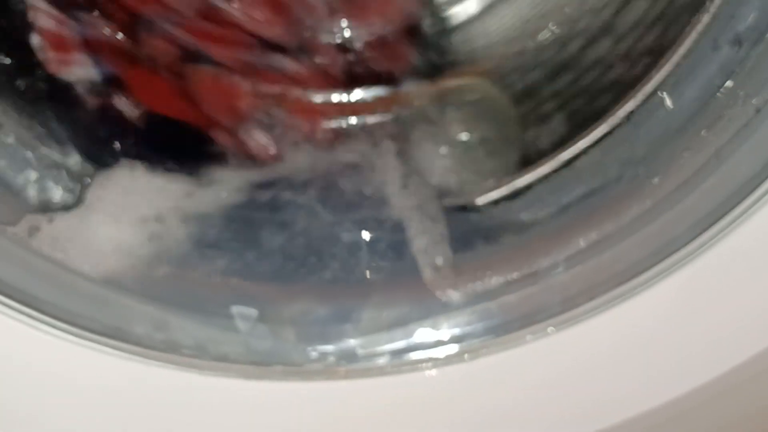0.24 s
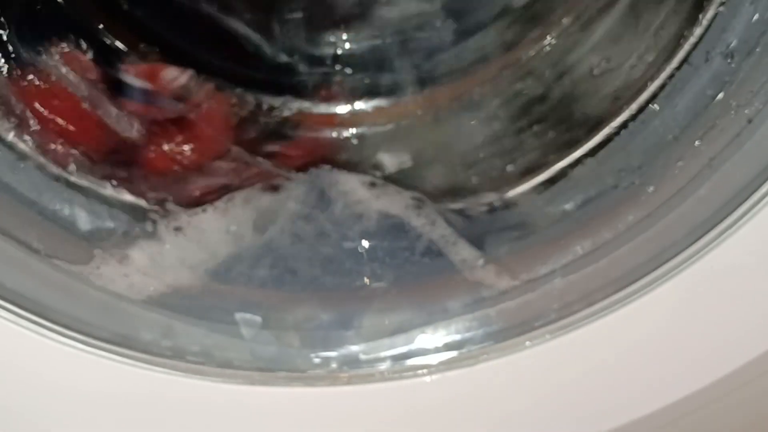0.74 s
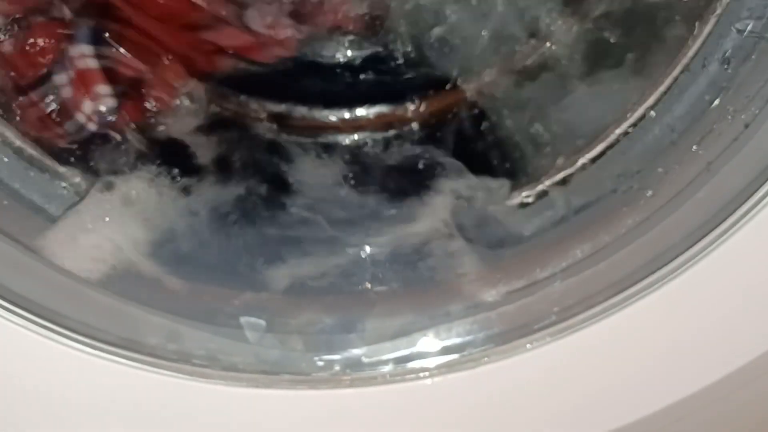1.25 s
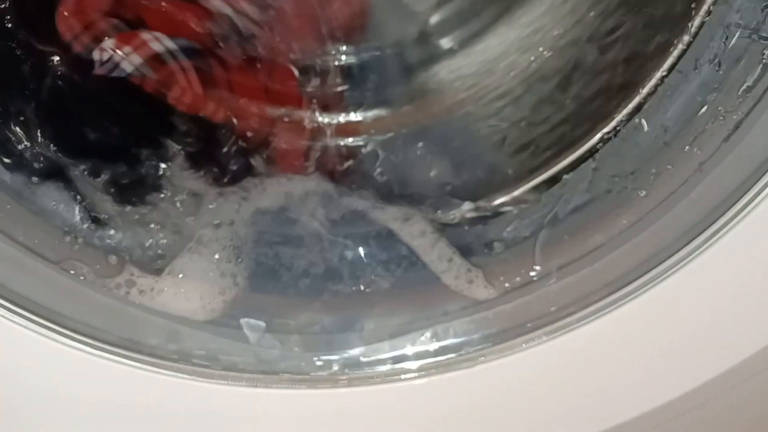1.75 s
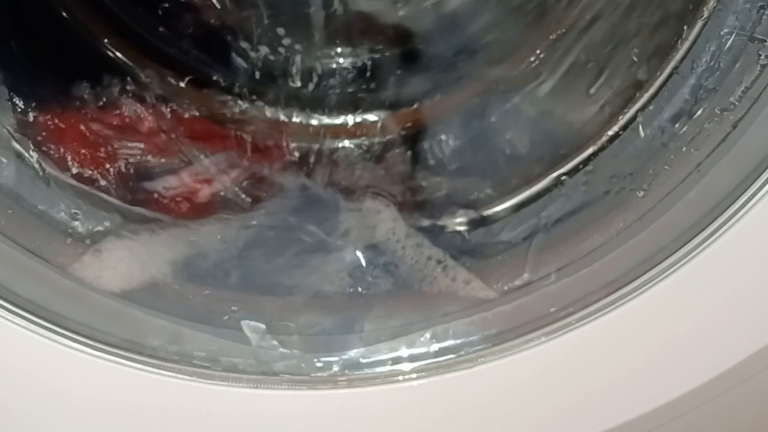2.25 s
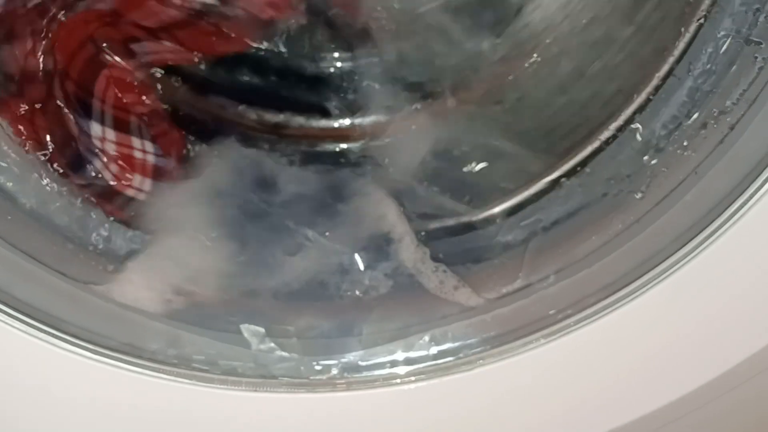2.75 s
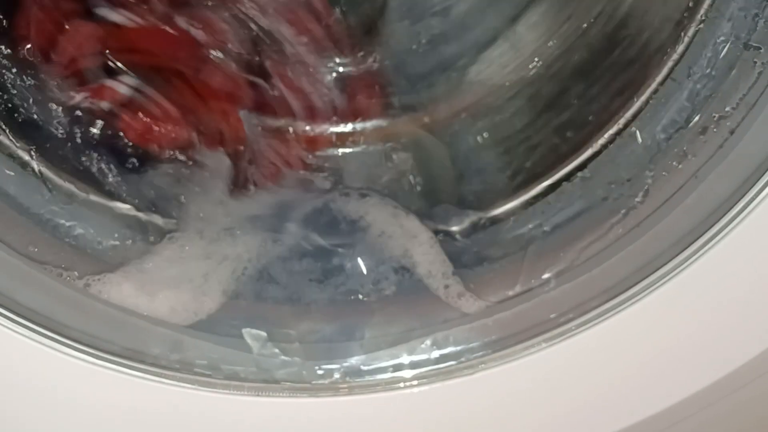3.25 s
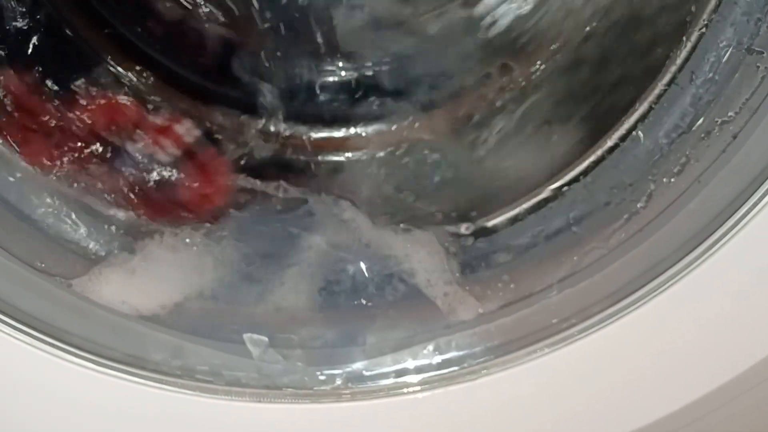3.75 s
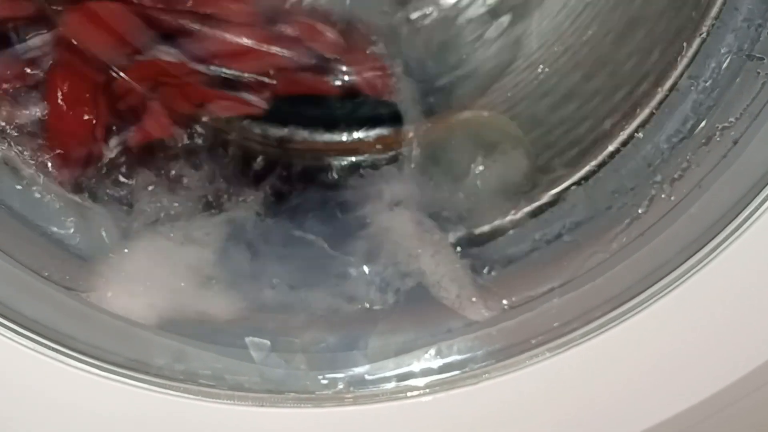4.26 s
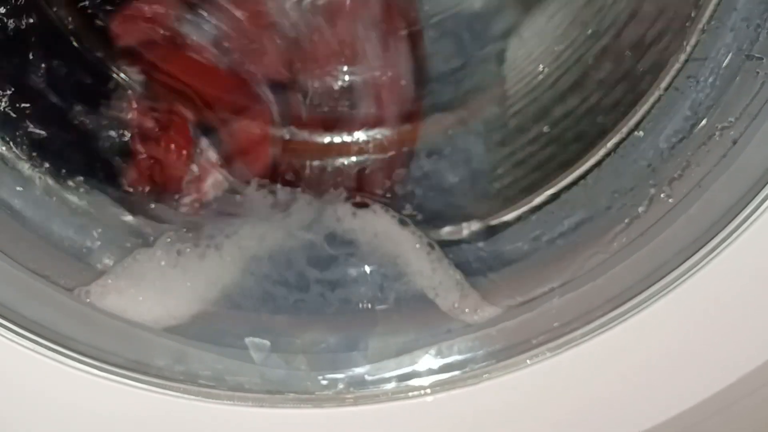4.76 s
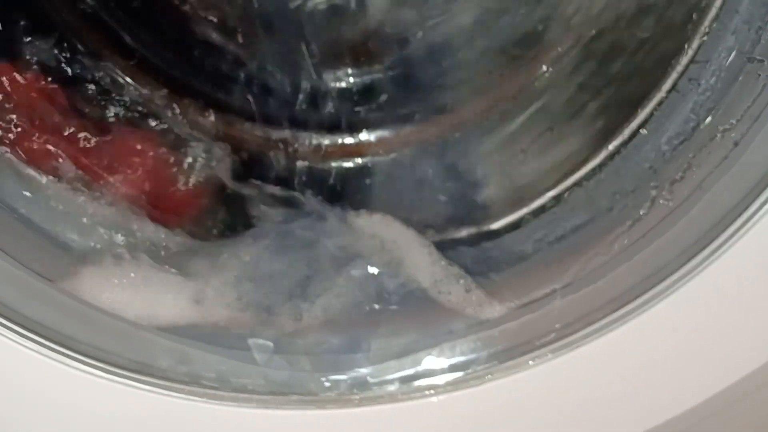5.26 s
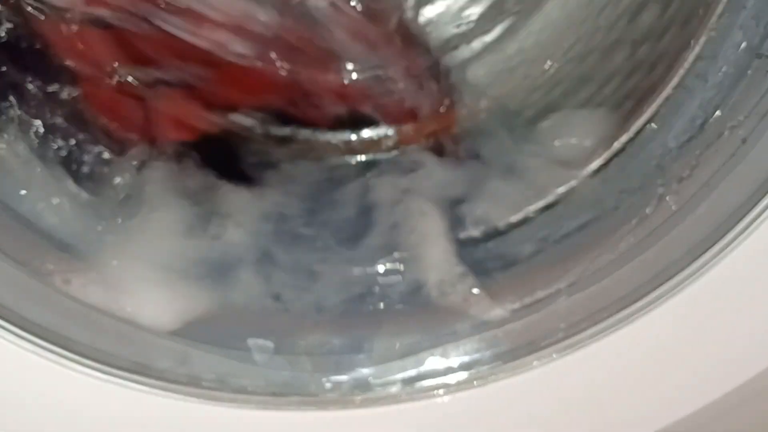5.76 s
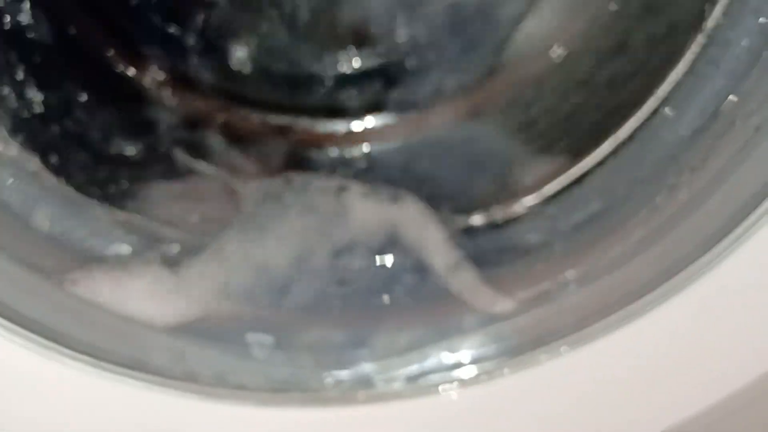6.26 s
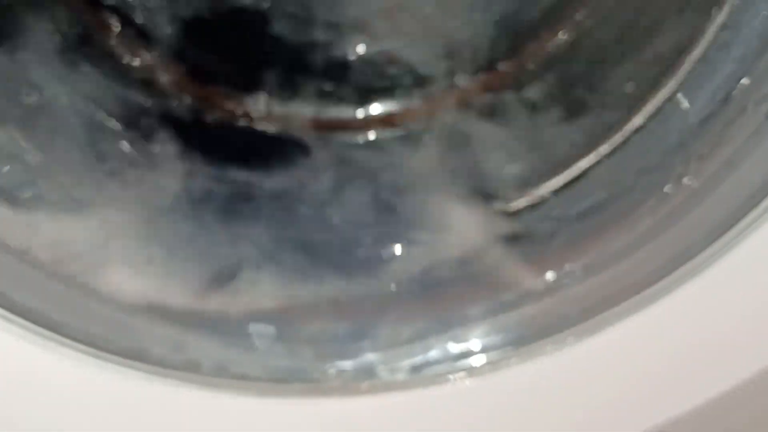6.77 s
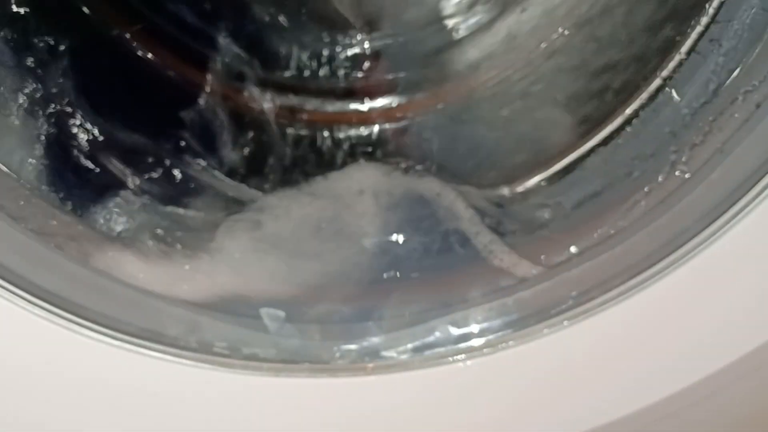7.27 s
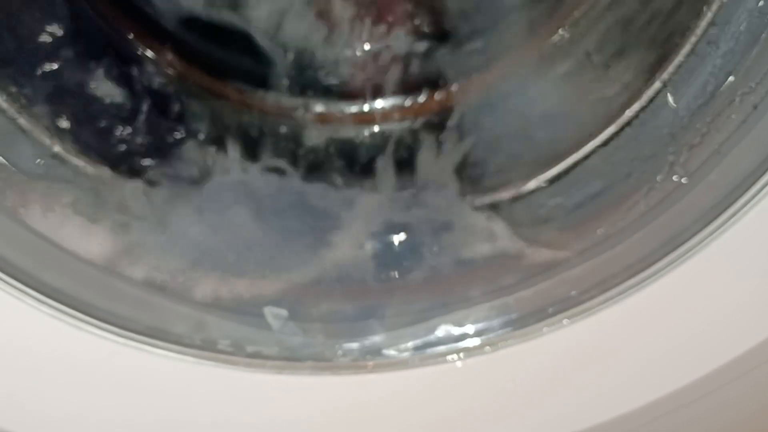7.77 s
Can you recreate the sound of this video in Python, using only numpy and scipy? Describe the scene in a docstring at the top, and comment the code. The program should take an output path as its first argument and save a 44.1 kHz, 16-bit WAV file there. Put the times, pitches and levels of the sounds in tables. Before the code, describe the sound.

A front-loading washer churns wet laundry up close, water sloshing and booming in the tub, spraying the glass door, with one hard knock midway.

```python
"""A front-loading washing machine tumbles wet laundry, heard close to its glass door.
From the start water heaves in the resonant tub, splashes and tinkles in the steel drum and sprays the glass.
Soon wet cloth flops down as damped pushes, air pockets gurgle as bubble notes and drops tick on the door.
Later something hard, perhaps a button, knocks on the glass and clinks on the steel, ringing their modes."""
import sys
import numpy as np
from scipy import signal
from scipy.fft import rfft, irfft
from scipy.io import wavfile

SR = 44100
rng = np.random.default_rng(int(sys.argv[2]) if len(sys.argv) > 2 else 0)


def log_audio(samples):
    """Write samples as a 16-bit WAV file to the path given in sys.argv[1]."""
    # one column per channel
    frames = np.atleast_2d(samples).T
    # limit to full scale, then quantise
    limited = np.clip(frames, -1, 1)
    pcm = np.round(limited * 32767).astype(np.int16)
    wavfile.write(sys.argv[1], SR, pcm)


N = 353593
HZ = np.fft.rfftfreq(N, 1 / SR)  # frequency of every bin
T = np.arange(N) / SR  # time in the scene, s
RING = np.arange(SR // 3) / SR  # time since an impact, s

# modes of the steel drum: (frequency [Hz], relative level [dB], t60 [s])
STEEL_MODES = [(1956, -5.5, 0.058), (2031.8, -5, 0.055), (2127, -10, 0.025), (2600, -13, 0.025)]
# spectrum of spray and drops on the door: (frequency [Hz], relative level [dB])
SPRAY_SPECTRUM = [(1260, 8.5), (2560, 3), (3760, 1.5), (5260, -1), (6160, -7), (7260, -6.5), (7760, -12),
                  (8400, -13), (8900, -10), (9860, -10.5), (11660, -6), (13460, -7.5), (14660, -11.5),
                  (15700, -16)]
# envelope of a slosh's splashing: (rise [s], sag [dB/s], drain time constant [s], steady churn [dB])
SPLASH_ENVELOPE = (0.21, 21, 0.07, -45.5)


def amp(db):
    """Converts level to amplitude: 20 dB is a factor of ten."""
    return 10 ** (np.asarray(db) / 20)


def unit(x):
    """Normalizes the mean power to 1."""
    return x / np.sqrt(np.mean(x ** 2) + 1e-20)


def read(points):
    """Interpolates a table over log frequency, as pitch is spaced."""
    hz, value = np.transpose(points)
    return np.interp(np.log(HZ + 1), np.log(hz), value)


def colour(x, gain):
    """Filters linearly: the spectrum is multiplied by a gain for every bin."""
    return irfft(rfft(x) * gain, N)


def add(mix, s, sound):
    """Superposes a sound on the mix from time s."""
    part = mix[..., round(s * SR):][..., :sound.shape[-1]]
    part += sound[..., :part.shape[-1]]


def wander(rate):
    """Low-passes noise to a slow fluctuation of rms 1, up to about rate in Hz."""
    return unit(colour(rng.standard_normal(N), np.exp(-(HZ / rate) ** 2)))


def two_sides(x):
    """Sets the coherence of the sides: two unrelated signals become a pair that shares its bass."""
    # (frequency [Hz], coherence of left and right [0-1])
    coherence = [(100, .985), (250, .96), (380, .85), (500, .2), (1000, .03), (2000, 0)]
    same = np.clip(read(coherence), 0, 1)
    right = colour(x[0], same) + colour(x[1], np.sqrt(1 - same ** 2))
    return np.array([x[0], right])


def impacts(per_s, spread_db):
    """A Poisson-like train of clicks of either sign, with levels spread exponentially in dB."""
    size = amp(spread_db * np.minimum(rng.exponential(1, N), 4.5))
    sign = rng.choice([-1, 1], N)
    return size * sign * (rng.random(N) < per_s / SR)


def bursts(per_s, spread_db, decay, tail_db):
    """Incoherent impacts add in power: noise follows their decays, each with a faint tail from the drum."""
    dying = np.exp(-2 * RING / decay) + amp(2 * tail_db) * np.exp(-RING / 0.012)
    power = signal.oaconvolve(impacts(per_s, spread_db) ** 2, dying)[:N]
    return unit(np.sqrt(abs(power)) * rng.standard_normal((2, N)))


def echoes(x, t60):
    """Diffuse reverberation: exponentially decaying noise, different on each side, of about energy 1."""
    tail = rng.standard_normal((2, len(RING))) * amp(-60 * RING / t60)
    tail = tail / np.linalg.norm(tail[0])
    return signal.oaconvolve(np.atleast_2d(x), tail, axes=1)[:, :N]


def ring(modes, rise):
    """Modal synthesis: damped sines build up over a short contact time."""
    waves = sum(amp(db - 60 * RING / t60) * np.sin(2 * np.pi * hz * RING) for hz, db, t60 in modes)
    return waves * (1 - np.exp(-RING / rise))


def bubble(hz, cycles, glide):
    """Bubble resonance: a note dies away over some cycles, its pitch rising as it nears the surface."""
    age = RING[:int(5 * SR * cycles / hz)] * hz / cycles  # in decay times
    turns = cycles * age * (1 + glide * age / 2) + rng.random((2, 1))
    return (np.exp(-age) - np.exp(-age * cycles)) * np.sin(2 * np.pi * turns)


def bubbles(count, low_hz=450, high_hz=3400, cycles=8, glide=0.039, spread_db=0.5):
    """Superposed bubble resonances at random times, spread evenly in log pitch."""
    out = np.zeros((2, N))
    for when, pitch, size in rng.random((count, 3)):
        hz = low_hz * (high_hz / low_hz) ** pitch
        strength = hz * amp(-spread_db * np.log(size + 0.0205))
        add(out, when * N / SR, strength * bubble(hz, cycles, glide))
    return unit(out)


def sloshing(shape, axis, lead=0):
    """Power addition: the level in dB of all sloshes, starting up to lead seconds early, over a steady churn."""
    # water tipped over by the drum: (start [s], length [s],
    # heave in the tub [dB], splashing [dB], spray on the door [dB])
    sloshes = [(0.0, 0.04, -35.5, -36.5, -62), (0.1, 0.23, -32, -39, -54), (0.335, 0.23, -33.5, -39, -54.5),
               (0.68, 0.41, -39, -55.5, -67), (0.908, 0.11, -30, -33, -49.5),
               (1.07, 0.11, -33.5, -35, -46.5), (1.171, 0.21, -24, -34, -50), (1.418, 0.29, -29, -40, -52),
               (1.77, 0.12, -34.5, -38.5, -53), (1.938, 0.19, -34.5, -43, -51),
               (2.358, 0.1, -36.5, -39.5, -55), (2.525, 0.23, -35, -43, -52),
               (2.916, 0.12, -39, -44, -53.5), (3.053, 0.091, -32.5, -35.5, -53),
               (3.19, 0.07, -31.5, -42, -51), (3.29, 0.06, -34.5, -39, -55),
               (3.398, 0.086, -33, -38.5, -50.5), (3.59, 0.047, -39.5, -55, -58),
               (3.828, 0.34, -34, -40, -51.5), (4.216, 0.222, -39, -58.5, -54.5),
               (4.524, 0.09, -27, -44, -54.5), (4.766, 0.07, -37, -44, -57.5),
               (4.918, 0.28, -33.5, -42, -51.5), (5.337, 0.14, -34, -45, -52.5),
               (5.633, 0.3, -33.5, -41, -53.5), (6.028, 0.15, -29.5, -39, -55.5),
               (6.524, 0.13, -31, -32.5, -47), (6.678, 0.13, -31.5, -35, -44.5),
               (7.137, 0.21, -35.5, -44.5, -53.5), (7.527, 0.17, -39.5, -40.5, -49.5),
               (7.74, 0.19, -33.5, -40.5, -50.5)]
    rise, sag_db_per_s, drain, churn_db = shape
    power = np.full(N, amp(churn_db) ** 2)
    for start, length, *levels_db in sloshes:
        age = np.arange(0, length + 6 * drain, 1 / SR)
        build = np.sin(np.pi / 2 * np.minimum(age / rise, 1))
        fall = amp(-sag_db_per_s * age) * np.exp(-np.maximum(age - lead - length, 0) / drain)
        add(power, max(start - lead, 0), (amp(levels_db[axis]) * build * fall) ** 2)
    return 10 * np.log10(power)


def tub():
    """Resonant transfer function of the water-filled tub: a sum of damped oscillators."""
    # (frequency [Hz], width [Hz], peak gain [dB])
    resonances = [(80, 5.4, -16.5), (133.4, 5.9, -2), (165.4, 6.3, 1.5), (183.3, 8.8, 1.5),
                  (211.5, 10, 1.5), (249.5, 26.9, -1), (279.3, 17.7, 2), (320.8, 10, -1.5)]
    return sum(amp(db) * width * HZ / (width * HZ + 1j * (HZ ** 2 - hz ** 2))
               for hz, width, db in resonances)


def cavity():
    """Cavity resonance: the drum's air and walls lift bands of the water's sound."""
    # (frequency [Hz], full width at half the lift [Hz], lift [dB])
    lifts = [(570, 55, 2.5), (670, 37, 3.5), (737, 31, 9), (811.6, 31, 7), (840, 9.3, 6), (1075.5, 73, 4),
             (1374, 56, 3.5), (1513, 33, 5.5), (1824, 630, 4), (2550, 210, 4), (3835, 75, 4.5),
             (6940, 75, 7.5)]
    return amp(sum(db / (1 + (2 * (HZ - hz) / width) ** 2) for hz, width, db in lifts))


def heave(level_db=-1.5, lumpy_db=0.5):
    """Forced resonance: lumps of water shove the tub, which booms."""
    # (rise [s], sag [dB/s], drain time constant [s], steady churn [dB])
    envelope = (0.0517, 2.5, 0.09, -40.5)
    shoves = np.array([unit(impacts(per_s=700, spread_db=-0.5)) for side in range(2)])
    boom = unit(colour(two_sides(shoves), tub() / (1 + (HZ / 520) ** 4)))
    return boom * amp(sloshing(envelope, axis=0) + level_db + lumpy_db * wander(rate=11.0))


def splash(level_db=1, bubbles_db=-11.0, patchy_db=0.47):
    """Broadband impact noise of breaking water holds faint bubble resonances, coloured by the drum."""
    # (frequency [Hz], relative level [dB])
    spectrum = [(218, -19), (405, -66), (525, -2), (820, -2.5), (1035, -3.5), (1535, -9), (2065, -11.5),
                (2375, -15.5), (2965, -26.5), (4565, -21.5), (9155, -60.5)]
    breaking = bursts(per_s=1500, spread_db=1.3, decay=0.00083, tail_db=-13.0)
    breaking = breaking * amp(patchy_db * wander(rate=26.0))
    water = breaking + amp(bubbles_db) * bubbles(count=4000)
    coloured = unit(colour(two_sides(water), amp(read(spectrum)) * cavity()))
    return coloured * amp(sloshing(SPLASH_ENVELOPE, axis=1) + level_db)


def tinkle(level_db=-16, per_s=14, spread_db=2):
    """Modal excitation: falling drops strike the steel drum, each waking one of its modes."""
    pings = 0
    for hz, _, t60 in STEEL_MODES:
        note = ring([(hz, 0, t60)], rise=0.001)  # all modes are equally strong here
        pings = pings + signal.oaconvolve(impacts(per_s, spread_db), note)[:N]
    return unit(echoes(pings, t60=0.0072)) * amp(sloshing(SPLASH_ENVELOPE, axis=1) + level_db)


def spray(level_db=5.5, patter_db=-3.5, dull_db=-3, patter_slope=-0.5, calm_db=-54, flutter_db=0.5,
          brighten=0.27, sizzle_hz=8000, drift_db=0.8):
    """Impact noise over steady noise: droplets patter on glass over duller suds fizz; swells are brighter."""
    # (rise [s], sag [dB/s], drain time constant [s], steady churn [dB])
    envelope = (0.08, 5, 0.16, -54)
    wet_db = sloshing(envelope, axis=2, lead=0.026) + flutter_db * wander(rate=17.0)
    patter = bursts(per_s=270, spread_db=5.5, decay=0.001, tail_db=-4)
    dull = amp(dull_db * np.clip((HZ - 5000) / 4000, 0, 1))
    fizz = colour(rng.standard_normal((2, N)), dull)
    # patter loses ground to the fizz as the spray swells, by half a dB per dB
    thrown = amp(patter_db + patter_slope * (wet_db - calm_db))
    hiss = unit(colour(fizz + thrown * patter, amp(read(SPRAY_SPECTRUM)) * cavity()))
    coarse = colour(hiss, 1 / (1 + (HZ / sizzle_hz) ** 8))
    sizzle = (hiss - coarse) * amp(brighten * (wet_db - calm_db) + drift_db * wander(rate=8.2))
    return (coarse + sizzle) * amp(wet_db + level_db)


def flops(level_db=-5.0, boom_db=1, side_db=-16):
    """Impulsive excitation: wet cloth lands with a soft push of a few cycles, and the tub rings on."""
    # cloth landings: (time [s], relative level [dB], pitch of the push [Hz], its time to peak [s])
    landings = [(0.129, -22, 175, 0.0064), (0.176, -21, 274.5, 0.0076), (0.225, -24.5, 191, 0.0045),
                (0.244, -22.5, 275, 0.0074), (0.525, -22, 280.7, 0.0047), (0.983, -16.5, 284, .005),
                (1.021, -17.5, 277.3, 0.0035), (1.189, -18, 120, .005), (1.222, -21.5, 179, 0.0043),
                (1.238, -17, 268, 0.0052), (1.257, -17.5, 193, 0.0048), (1.276, -16, 280, 0.0062),
                (1.314, -14, 299, 0.0056), (1.369, -21, 291, 0.0033), (1.415, -19, 213.6, .005),
                (1.465, -20, 286, 0.0039), (1.487, -19, 167, 0.0092), (1.544, -28, 254, .005),
                (1.681, -20, 196, 0.0044), (2.043, -20.5, 286.5, 0.0094), (2.69, -23, 180, .006),
                (3.103, -21, 188, .005), (3.126, -18.5, 166, 0.0033), (3.219, -19.5, 110.5, 0.0035),
                (3.261, -26, 130, 0.0067), (3.373, -27, 192, 0.0021), (3.43, -12.5, 164, 0.0032),
                (3.443, -15.5, 245, .005), (3.456, -12, 196, 0.003), (3.461, -19.5, 314, 0.0029),
                (3.496, -23, 168, 0.011), (3.527, -26, 165, 0.0091), (3.607, -30.5, 280, 0.0069),
                (3.839, -23, 129, 0.0096), (4.055, -27.5, 286, 0.0056), (4.544, -19.5, 164, 0.0033),
                (4.57, -16, 202, 0.0049), (4.584, -20, 125, 0.0088), (4.613, -32, 177, .005),
                (4.96, -27, 127, 0.0068), (5.031, -24.5, 267, 0.0053), (6.051, -23.5, 260, 0.0064),
                (6.074, -17.5, 284, 0.0062), (6.169, -21, 214, 0.0062), (6.832, -20, 262, 0.0039)]
    push = np.zeros(N)
    for s, db, hz, length in landings:
        swell = RING / length * np.exp(1 - RING / length)
        add(push, s, amp(db) * swell * np.sin(2 * np.pi * hz * RING))
    thud = .5 * push + amp(boom_db) * colour(push, tub())
    return amp(level_db) * (thud + amp(side_db) * echoes(thud, t60=0.41))


def gurgle(width_octaves=0.53, froth_db=-3.3, notes_db=-6, scatter_octaves=0.344, cycles=7, glide=0.036):
    """Bubble resonance: air pockets folded under water break into froth and clusters of rising notes."""
    # air pockets: (time [s], relative level [dB], half length [s], centre of the gulp [Hz])
    pockets = [(0.2, -38, 0.02, 630), (0.271, -30.5, 0.018, 670), (1.009, -35, 0.032, 692),
               (1.207, -37, 0.034, 615), (1.32, -27.5, 0.0226, 713), (1.302, -38, 0.04, 426),
               (1.575, -39, 0.17, 665), (3.08, -35.5, 0.0085, 1350), (3.109, -33.5, 0.011, 520),
               (3.112, -32, 0.015, 830), (3.204, -28.5, 0.0106, 542), (3.248, -38, 0.025, 474),
               (3.457, -34, 0.01, 398), (4.055, -36, 0.025, 786), (5.402, -39, 0.0134, 680),
               (6.098, -35.5, 0.049, 680)]
    gulps = two_sides(bursts(per_s=1700, spread_db=2.0, decay=0.0046, tail_db=-16))
    drum, out = cavity(), np.zeros((2, N))
    for s, db, length, hz in pockets:
        band = np.exp(-(np.log2((HZ + 1) / hz) / width_octaves) ** 2)
        froth = unit(colour(gulps, drum * band))
        out += froth * amp(db + froth_db) * np.exp(-((T - s) / length) ** 2 / 2)
        for when, pitch in rng.uniform(-1.1, 1, size=(6, 2)):
            note = bubble(hz * 2 ** (scatter_octaves * pitch), cycles, glide)
            add(out, s + when * length, amp(db + notes_db) * note)
    return out


def drops(note_db=-6, splat_db=-2, decay=0.0069):
    """Damped oscillation and band noise: each larger drop plinks or splats on the door and dies away."""
    # single drops: (time [s], relative level [dB], pitch [Hz], width [octaves]: narrow plinks, wide splats)
    landings = [(0.3607, -38, 5480, .15), (1.058, -55, 6900, 1.4), (1.117, -41, 6440, 1.5),
                (1.215, -32, 11600, 1.3), (1.525, -40.5, 4830, 0.29), (3.431, -37, 2490, 1.6),
                (4.9397, -46.5, 3600, 1.3), (4.9827, -39, 4900, 0.27), (5.02, -46, 3130, 1.4),
                (5.787, -39, 10300, .7), (6.561, -39, 12500, 1.2), (6.6245, -34, 5360, 2.7),
                (6.6886, -38, 4900, 1.4), (6.713, -37, 7050, 1.5), (6.772, -35, 11200, 1.4),
                (6.804, -35, 10960, 1.4), (6.854, -44, 9100, 1.4), (7.5894, -46, 5120, 1.0)]
    notes, splats = np.zeros((2, 2, N))
    for s, db, hz, octaves in landings:
        dying = amp(db) * np.exp(-RING / decay)
        wide = 2 ** (abs(octaves) / 2)
        band = signal.butter(2, [hz / wide, min(hz * wide, .45 * SR)], "band", fs=SR)
        noise = unit(signal.lfilter(*band, rng.standard_normal((2, len(RING)))))
        add(notes, s, dying * np.sin(2 * np.pi * (hz * RING + rng.random((2, 1)))))
        add(splats, s, dying * noise)
    return colour(amp(note_db) * notes + amp(splat_db) * splats, amp(read(SPRAY_SPECTRUM)))


def knocks(door_echo_db=-17, bright_echo_db=-8.5, crack_db=-9, crack_decay=0.0015, crack_hz=12300,
           crack_width_hz=1700, wide=0.83, snap_hz=8500):
    """Modal impact: a hard piece rings door, steel and glass, with a noisy crack at the contact."""
    # blows: (time [s], into the door [dB], into the steel drum [dB], glassy tick [dB])
    blows = [(3.193, -7.5, -56, -23), (5.022, -60, -31.5, -42), (5.681, -63, -33, -68),
             (6.497, -58.5, -33, -53), (6.528, -54, -30, -63), (6.5947, -48, -14, -33.5)]
    # modes of the door: (frequency [Hz], relative level [dB], t60 [s])
    door_modes = [(80, -17, 0.29), (147, -16, 0.13), (347, -7, 0.121), (408, 4, 0.024), (480, -1, 0.02),
                  (620, -14, 0.059), (720, -24, 0.083), (1090, -24.5, 0.039), (1580, -31, 0.064)]
    # modes of the glass: (frequency [Hz], relative level [dB], t60 [s])
    glass_modes = [(5760, -12, 0.0164), (6200, -13, 0.027), (6970, -8, 0.0315), (11000, -21, 0.0202),
                   (11350, -2.5, 0.0205), (12220, -5, 0.0195), (12250, -15, 0.018), (13020, -6, 0.029),
                   (13800, -12.5, 0.0163)]
    low, bright = np.zeros(N), np.zeros(N)
    crack_spectrum = (wide * np.exp(-(HZ / snap_hz) ** 2)
                      + np.exp(-((HZ - crack_hz) / crack_width_hz) ** 2))
    for s, door_db, steel_db, glass_db in blows:
        contact = unit(colour(rng.standard_normal(N), crack_spectrum)[:len(RING)])
        crack = amp(crack_db) * contact * RING / crack_decay * np.exp(1 - RING / crack_decay)
        clink = amp(steel_db) * ring(STEEL_MODES, rise=0.002)
        tick = amp(glass_db) * (ring(glass_modes, rise=0.0017) + crack)
        add(low, s, amp(door_db) * ring(door_modes, rise=0.0015))
        add(bright, s, clink + tick)
    door = low + amp(door_echo_db) * echoes(low, t60=0.37)
    return door + bright + amp(bright_echo_db) * echoes(bright, t60=0.21)


def scene():
    """Colour difference between the two microphones: the right one is brighter, most of all in the treble."""
    # left minus right: (frequency [Hz], level difference [dB])
    tilt = [(72, 0.5), (132, -2), (206, -2.5), (246, 6), (282, -3), (405, 3), (625, -3), (1620, -1),
            (2420, -3.5), (3250, -3), (4250, -9.5), (5350, -8), (7650, -4.5), (9050, -7.5), (11850, -20),
            (14050, -13), (14850, -5)]
    wash = heave() + splash() + tinkle() + spray() + flops() + gurgle() + drops() + knocks()
    left = amp(read(tilt))
    sides = np.array([left, np.ones_like(left)])
    return colour(wash, sides * np.sqrt(2 / (1 + left ** 2)))  # keeps the summed power gain


def record(dry, low_hz=55, edge_hz=15950):
    """Band limitation: the microphone loses the deep bass, then a steep low-pass ends the treble."""
    high_pass = signal.butter(7, low_hz, "high", fs=SR, output="sos")
    thin = signal.sosfilt(high_pass, dry)
    low_pass = signal.firwin(511, edge_hz, window=("kaiser", 9), fs=SR)
    return signal.oaconvolve(thin, low_pass[None], "same")


dry = scene()
out = record(dry)
log_audio(out)
```